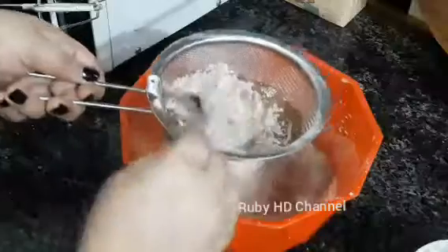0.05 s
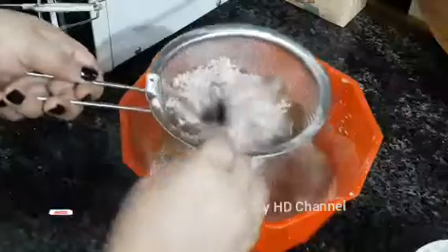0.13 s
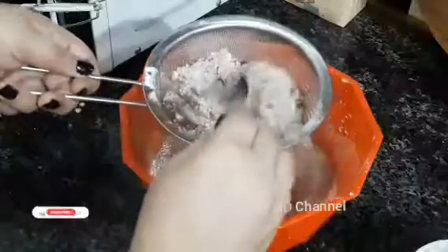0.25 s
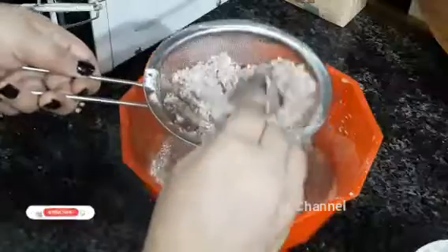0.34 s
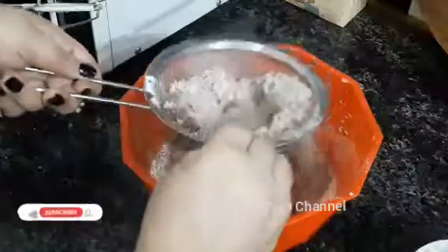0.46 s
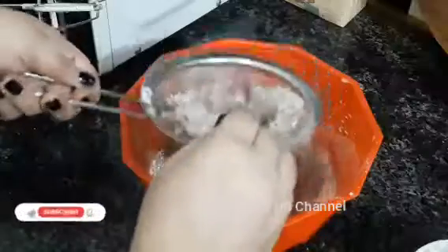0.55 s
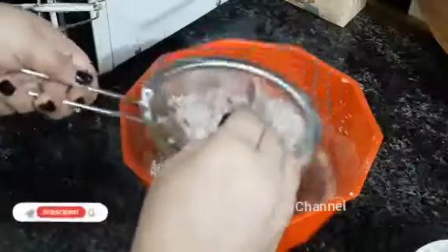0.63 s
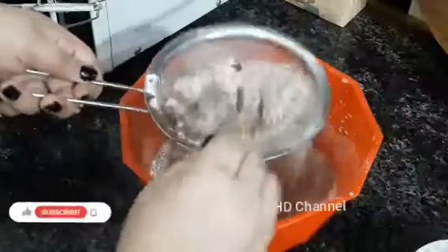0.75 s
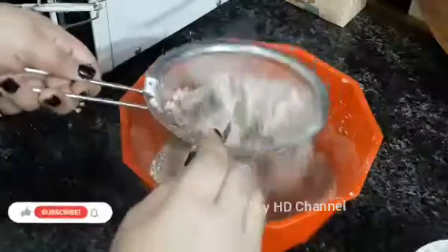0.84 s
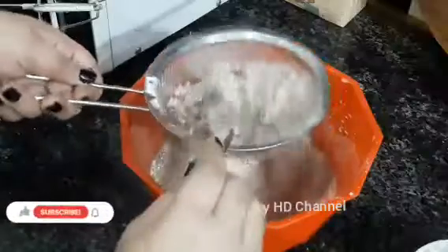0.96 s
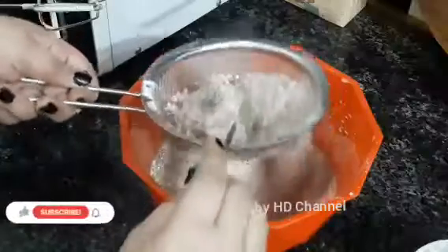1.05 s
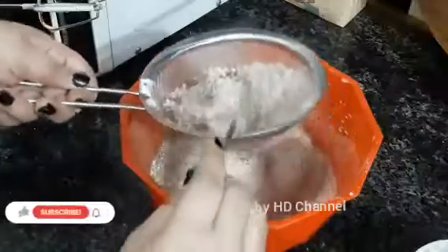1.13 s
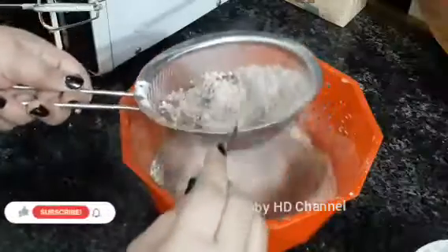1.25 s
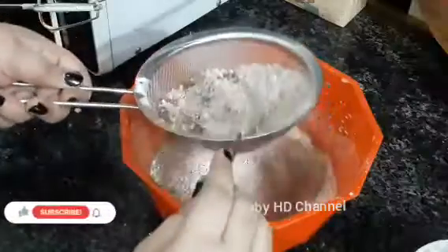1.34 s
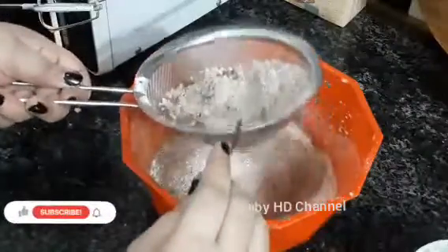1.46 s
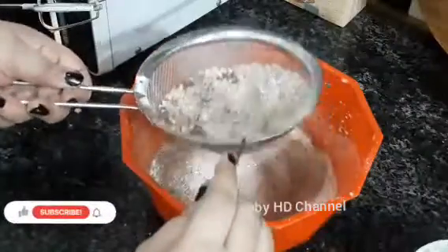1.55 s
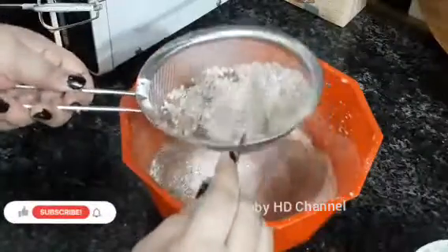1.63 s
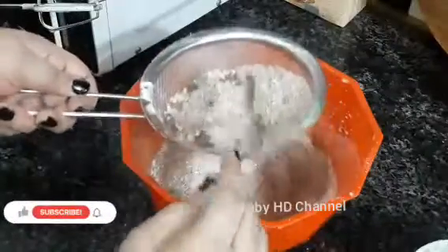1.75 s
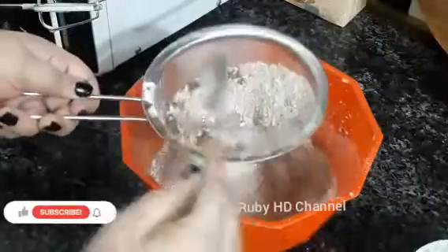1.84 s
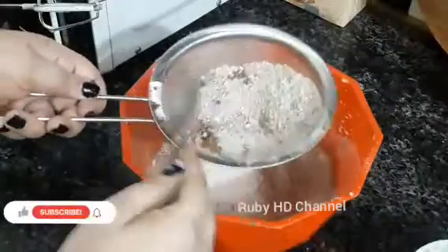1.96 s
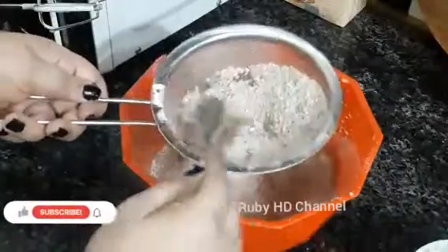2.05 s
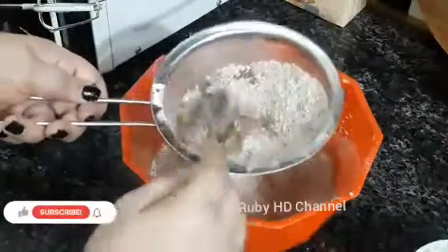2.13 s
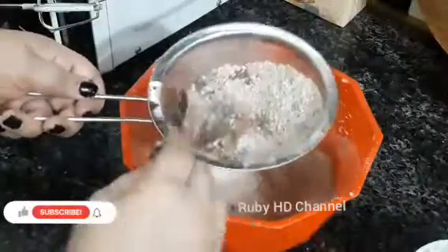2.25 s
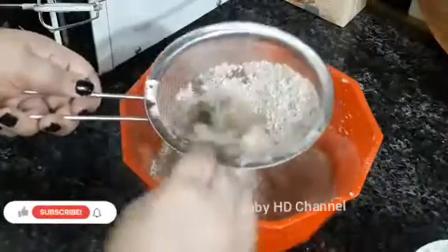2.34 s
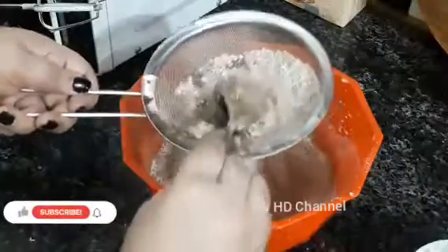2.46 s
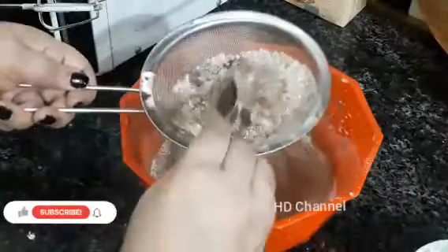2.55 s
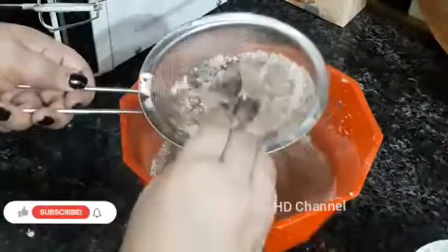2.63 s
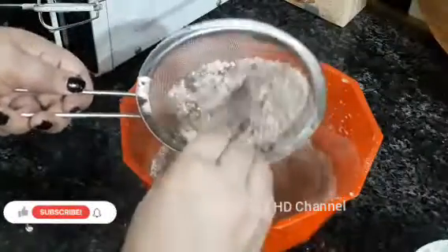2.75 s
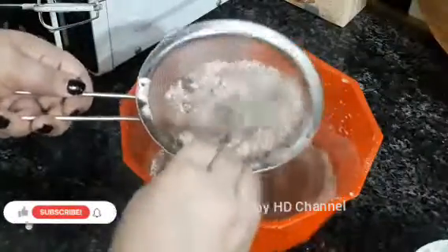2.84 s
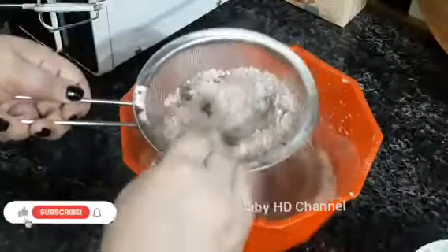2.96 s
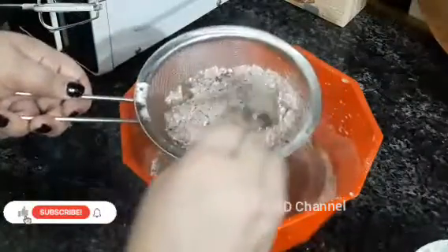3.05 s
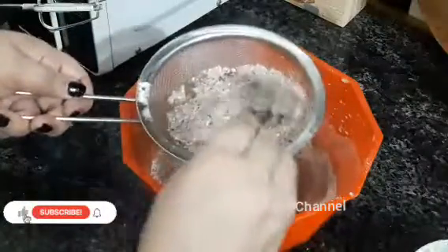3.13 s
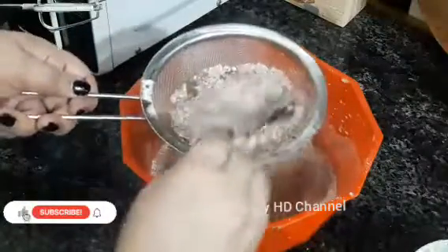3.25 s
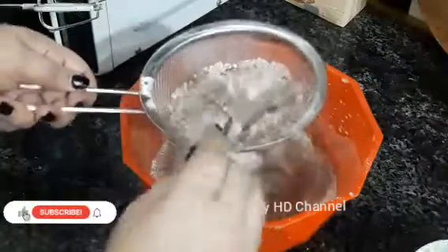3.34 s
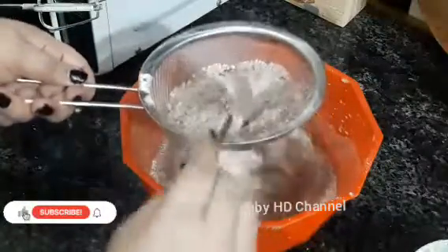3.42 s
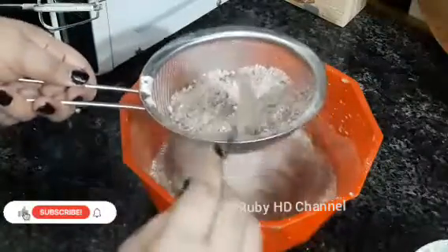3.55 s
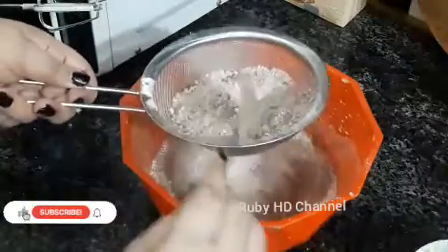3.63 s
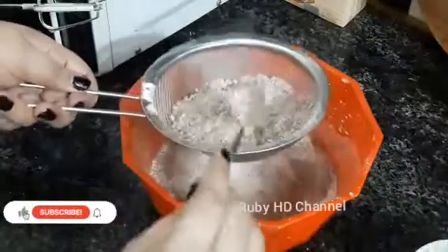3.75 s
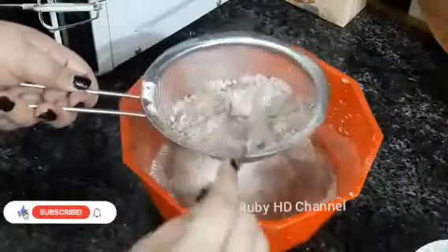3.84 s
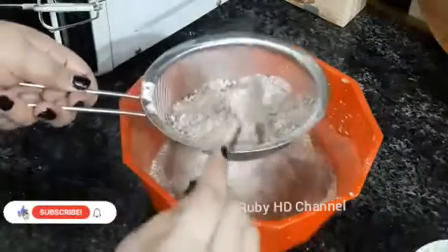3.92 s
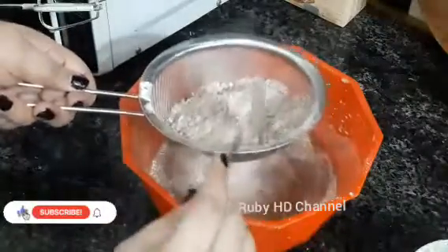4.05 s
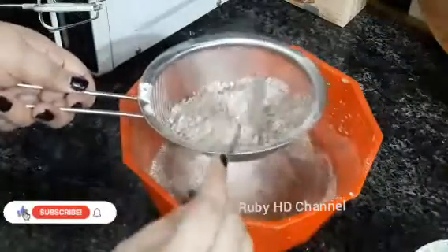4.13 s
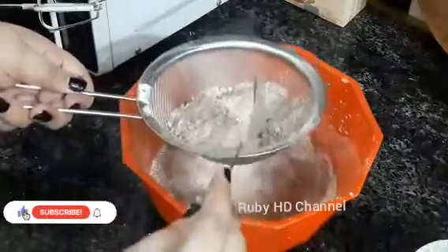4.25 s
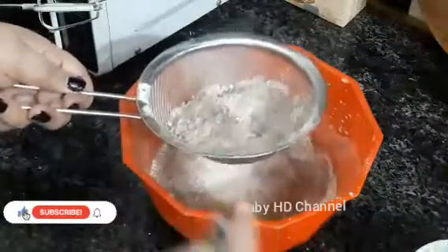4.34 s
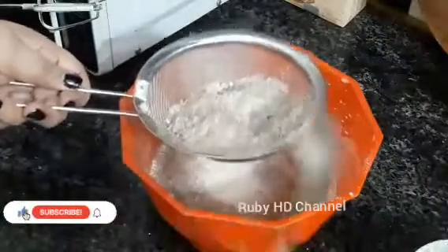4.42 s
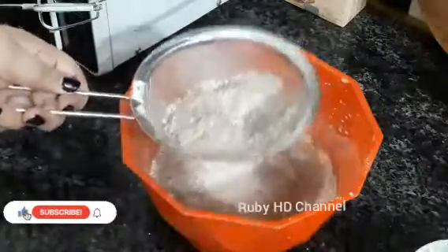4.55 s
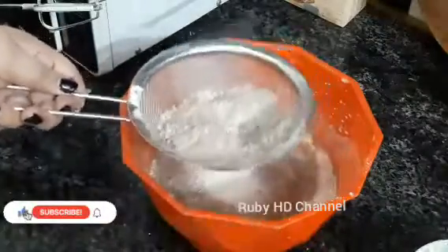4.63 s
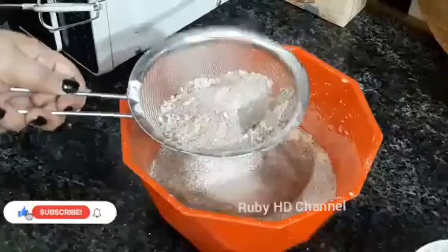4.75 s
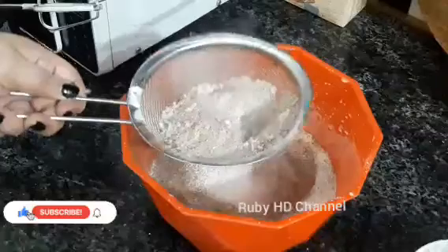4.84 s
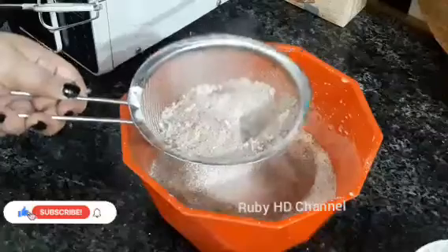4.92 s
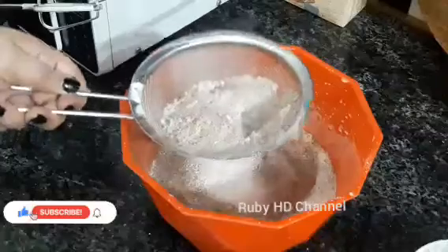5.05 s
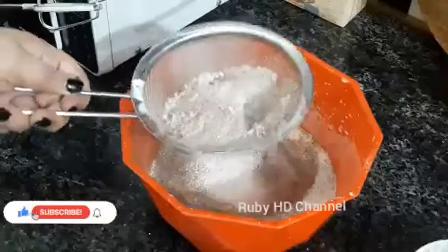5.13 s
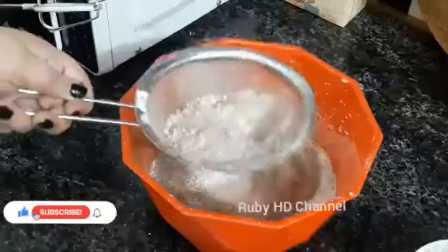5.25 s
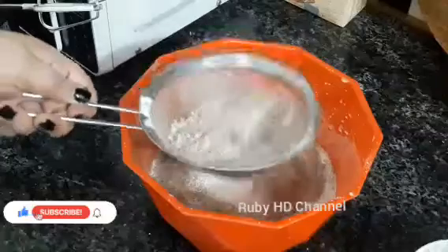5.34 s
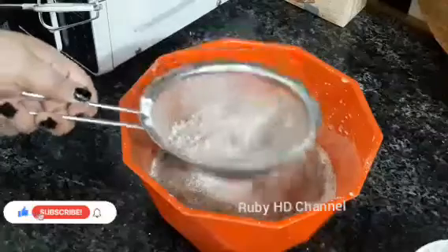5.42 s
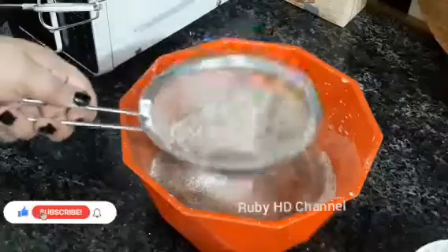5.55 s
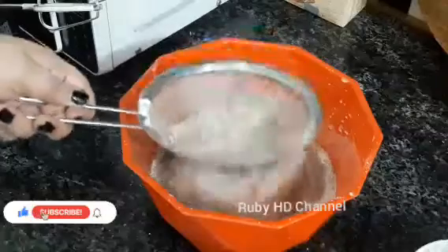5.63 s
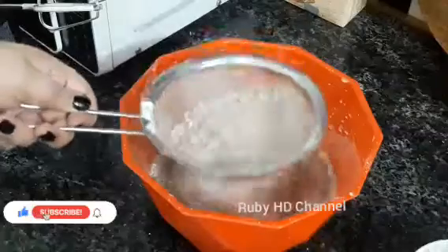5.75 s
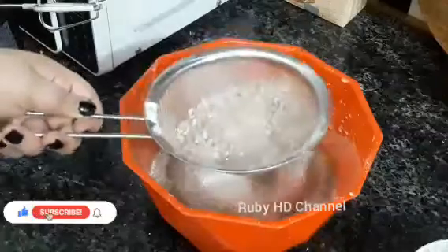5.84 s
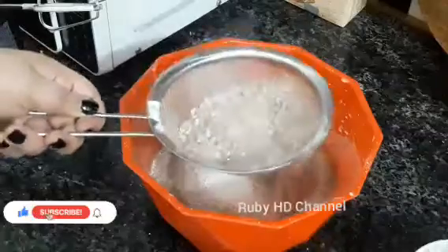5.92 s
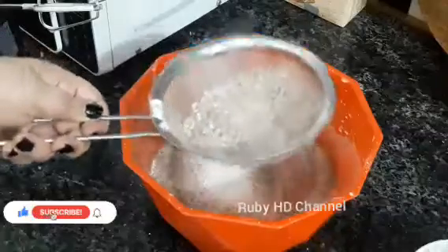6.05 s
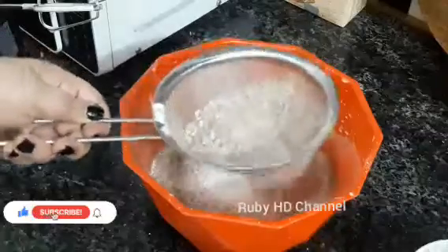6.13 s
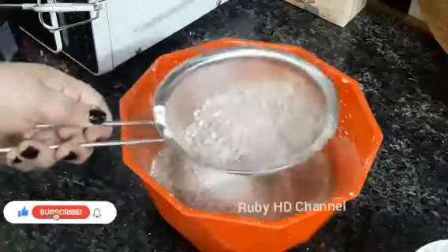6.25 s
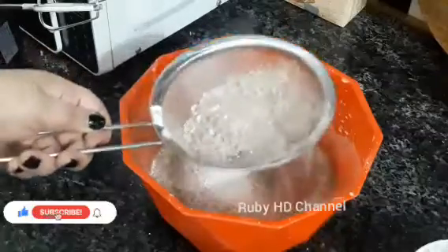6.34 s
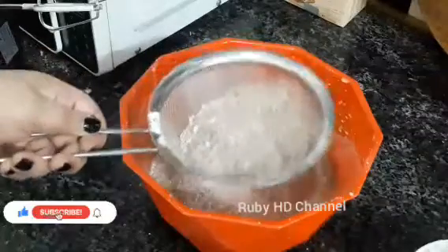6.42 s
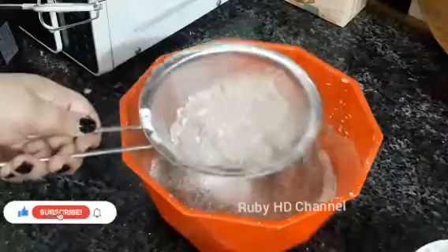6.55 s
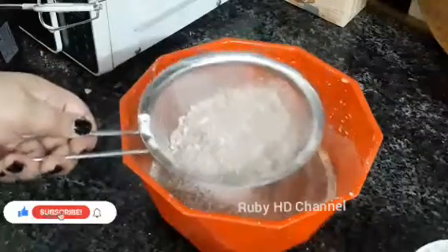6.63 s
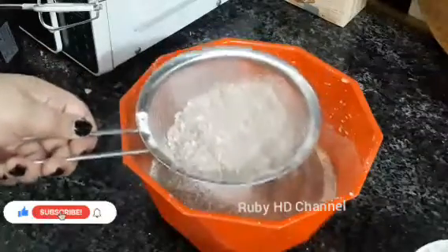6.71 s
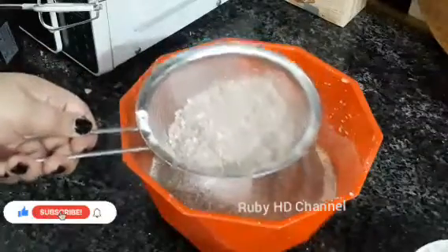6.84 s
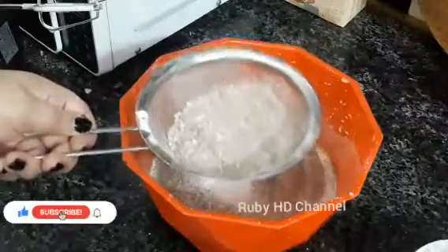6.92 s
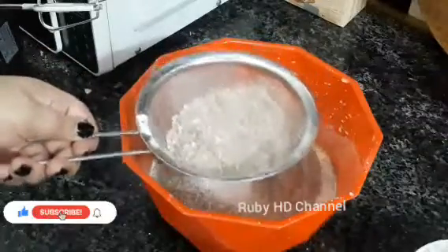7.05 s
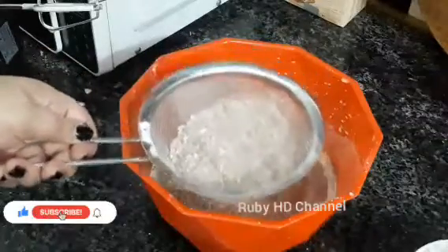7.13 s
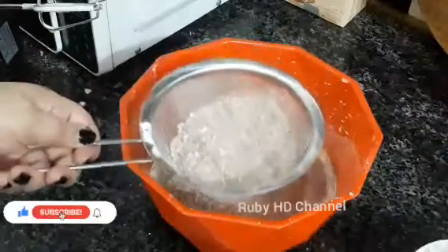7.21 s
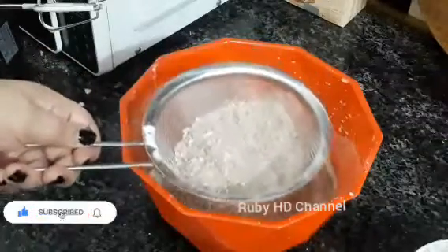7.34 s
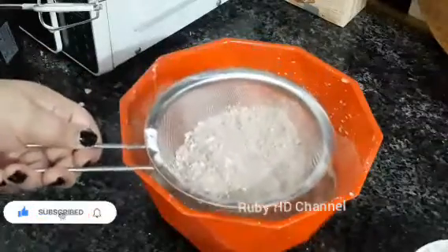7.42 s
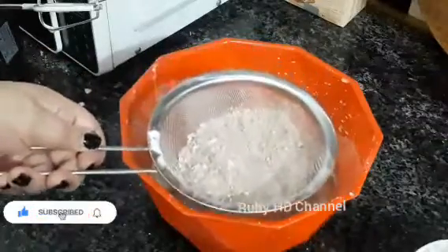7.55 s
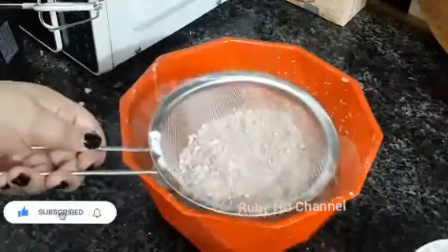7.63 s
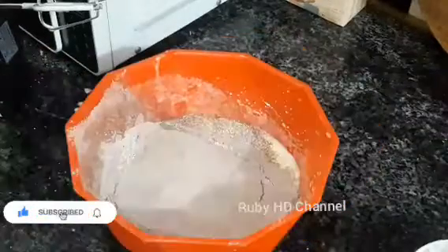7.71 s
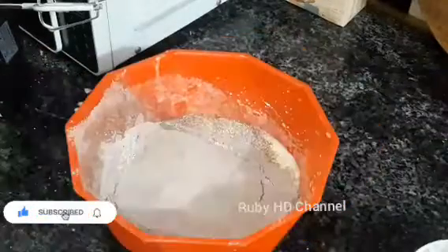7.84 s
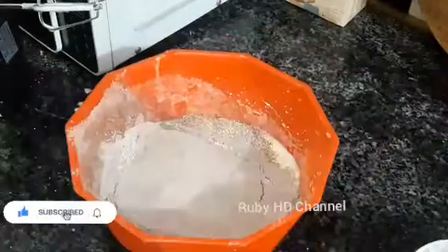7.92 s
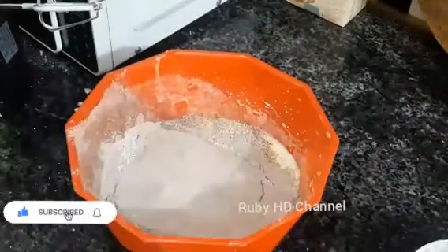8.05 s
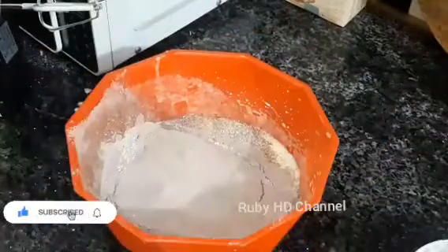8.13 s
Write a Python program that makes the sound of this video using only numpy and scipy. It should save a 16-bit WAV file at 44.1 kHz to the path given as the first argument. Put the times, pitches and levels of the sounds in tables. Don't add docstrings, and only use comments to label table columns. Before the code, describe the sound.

A spoon taps and scrapes a small wire sieve over a plastic bowl, then clatters onto stone, above low hum and a throbbing insect whine.

```python
import sys
import numpy as np
from scipy import signal
from scipy.fft import rfft, irfft, next_fast_len
from scipy.io import wavfile

SR = 44100
rng = np.random.default_rng(int(sys.argv[2]) if len(sys.argv) > 2 else 0)


def volts_from_decibels(level):
    exponent = np.asarray(level, float) / 20
    return 10 ** exponent


def transcribe(signal):
    frames = np.atleast_2d(signal).T
    limited = np.clip(frames, -1, 1)
    pcm = np.round(limited * 32767).astype(np.int16)
    wavfile.write(sys.argv[1], SR, pcm)


N = 360738
TIME = np.arange(N) / SR

# (frequency [Hz], level [dB per Hz])
RUMBLE_COLOUR = [(12, -90), (20, -42), (65, -26.5), (81, -15.5), (103, -16.5), (116, -10.5), (131, -16.5),
                 (202, -17.5), (334, -18), (581, -22), (834, -24), (1890, -43), (2520, -46), (4830, -51.5),
                 (6300, -63.5), (8190, -86), (13900, -120)]
# (frequency [Hz], level [dB per Hz])
HISS_COLOUR = [(6000, 0.5), (8200, -2), (8800, -13), (9600, -26.5), (10500, -14), (13000, -10), (14800, -4),
               (16000, -9)]
# (frequency [Hz], width [Hz], level [dB])
ROOM_TONES = [(240, 7.4, 1), (298.2, 8, -5), (355.8, 6.7, -2)]
# (middle [s], half length [s], level [dB])
FAR_BOUTS = [
    (0, 0.58, -68),
    (2.3, .25, -72),
    (4.5, .5, -75),
    (6.0, .5, -77),
    (8.2, .3, -74),
]
# (frequency [Hz], width [Hz], level [dB])
INSECTS = [(7323, 425, -47), (14900, 900, -82), (2383, 320, -71.5)]
# (time [s], lead [beats])
THROB_LEAD = [(0, 0.26), (4.8, 0.46), (6.2, 0.24), (7.65, .27)]
# (frequency [Hz], time to fall 60 dB [s])
ROOM_T60 = [(250, 0.61), (1000, 0.59), (3000, 0.49), (7000, 0.36), (15000, 0.25)]

# (time [s], peak [dB], pitch [Hz])
NUDGES = [
    (0.061, -39, 240),
    (2.325, -37, 270),
    (3.175, -38, 496),
    (3.189, -40, 1190),
    (3.21, -43, 1450),
    (3.2, -38, 350),
    (3.225, -39, 747),
    (7.51, -45, 343),
]
# (loudest at [s], swell [s], fade [s], level [dB], bowl relative [dB])
SCRAPES = [
    (0.062, 0.21, 0.21, -51.5, 0),
    (1.97, 0.011, 0.23, -40.5, -2),
    (2.335, 0.16, 0.075, -44.5, 0),
    (3.21, .07, 0.1, -41.5, 6.5),
    (8.17, 0.14, .3, -46, -20),
]
# (rim wire [dB], mesh sizzle [dB])
STROKE_TONE = [(1, 0), (-2, -3), (3.5, 0), (4.5, -1), (-6, -22)]
# (time [s], peak [dB], bowl thud relative [dB], mesh sizzle relative [dB])
TAPS = [(1.1882, -23.5, -13, 3), (1.274, -28.5, -4, -3), (1.363, -21.5, -13, 3), (1.518, -28, -18, -2),
        (1.526, -24, -12.5, 5), (1.5684, -29.5, -6, -14), (1.6761, -31.5, -8, 4), (1.681, -22, -14, 0),
        (1.959, -24.5, -6.5, -14), (3.493, -16.5, -18.5, -3), (3.5339, -27, -11.5, -5),
        (3.6728, -18, -16.5, 0), (3.719, -30.5, -18, -12), (3.8474, -19, -14, 2),
        (4.017, -21.5, -15.5, -1.5), (4.186, -17.5, -19.5, 4.5), (4.232, -32, -5.5, -14)]
# (time [s], peak [dB], mesh sizzle
# relative [dB])
SHAKES = [(0.606, -44, 2), (0.8245, -46.5, 3), (2.241, -41.5, -10), (2.826, -49.5, -17), (4.573, -42.5, 0),
          (4.7203, -56, 2), (4.879, -54, 3), (5.1714, -41, -1), (5.284, -55, 3), (5.3714, -55, 5),
          (5.5812, -50, 12), (5.7685, -56, 12), (6.1116, -58, 3), (6.34, -59, 2)]
# (frequency [Hz], level [dB per Hz])
TAP_COLOUR = [(250, -15), (500, 3), (900, -4.5), (2000, -6), (4000, -7.5), (6800, -0.5), (8600, -12),
              (11500, -2), (15000, -5), (16500, -1.5)]
# (frequency [Hz], level [dB], time to fall 60 dB [s])
RIM = [(1260, -17, .04), (2560, -13, .04), (3300, -14, .06), (5260, -13, .06), (6010, -7, .14),
       (6300, -9, .05), (6720, -9, .025), (7200, -8, .03)]
# (frequency [Hz], level [dB], time to fall 60 dB [s])
BOWL = [(260, -5.5, 0.09), (462, -4, .05), (513, 1, 0.06), (565, 0.5, 0.043), (635, -4.5, 0.034)]

# (frequency [Hz], level [dB], time to fall 60 dB [s])
HANDLE = [(2842, -2, .5), (2839.6, -4, .48), (2860, -9, .35), (2560, -12, .15), (3850, -13, .35)]
# (time [s], peak [dB], counter relative [dB])
BOUNCES = [(4.9948, -3.5, -26.5), (5.0015, -11, -12), (5.0164, -17, -55), (5.0334, -11, -23),
           (5.0458, -18, 3), (5.0564, -15.5, 7), (5.0611, -24, -8), (5.0713, -17.5, 2), (5.0844, -37, -7),
           (5.0944, -19, 0.5), (5.1055, -31.5, 16), (5.1174, -34, 1), (5.1284, -33, 8.5),
           (5.1424, -25.5, 6), (5.154, -53, -17)]
# (frequency [Hz], level [dB], time to fall 60 dB [s])
SPOON = [(3840, -4, .035), (4900, -10, .06), (4966, -8, .13), (5017, -8, .13), (5110, -10, .06),
         (5280, -11, .05), (5500, -11, .05), (6030, -15, .08), (7740, -15, .05), (10430, -21, .05),
         (10960, -24, .05), (11340, -21, .16), (13650, -20, .05), (14380, -17, .08)]
# (frequency [Hz], level [dB], time to fall 60 dB [s])
COUNTER = [(328, -10, .25), (480, -10, .08), (610, -9, .08), (672, -9, .1), (873, -12, .08), (960, -10, .1),
           (1145, -5, .1), (1366, -3, .09), (1395, -4, .1), (1426, -5, .07), (1561, -7, .1), (1509, -4, .1),
           (1690, -6, .06), (2170, -7, .05)]
# (frequency [Hz], level [dB per Hz])
CLATTER_COLOUR = [(120, -48), (200, -35), (316, 7.5), (440, -2.5), (671, 2), (1370, 4), (2420, -6.5),
                  (2910, -3.5), (3560, -12.5), (5130, -22), (16000, -56.5)]

CHANGE_S = 7.6522
RUMBLE_DB, RUMBLE_SINK_DB_PER_S, RUMBLE_LATE_DB = -51, 0.1265, -1.5
DRONE_DB, DRONE_FADE_DB_PER_S, DRONE_REST_DB = -44, 10.5, -59
HUM_HZ, HUM_DB = 100.488, -37.5
HUM_START_TURNS, HUM_JUMP_TURNS = -.09, .47
MOTOR_HZ, MOTOR_DB = 137.2, -46.5
THROB_HZ, THROB_JUMP_BEATS, THROB_LATE_HZ = 9.45, -.42, 0.38
PAUSE_S, PAUSE_WIDTH_S, PAUSE_DB = 5.17, .05, -5.5
STROKE_RANGE_DB, STROKE_BEND = 33, 1.19
BOWL_UPPER_DB = -3.5
TAP_KNOCK_DB, SHAKE_KNOCK_DB, SHAKE_THUD_DB = -5, -4, -10
REBOUND_GAP_S, REBOUND_KNOCK_DB = .06, 4
SHAKE_RING_DB = -8
TAIL_GRAIN_DB = 2
FLAT_S, HANDLE_DB, HANDLE_RISE_S = 5.075, -21, 0.027


def rms_one(x):
    return x / np.sqrt(np.mean(x ** 2) + 1e-20)


def at_hz(points, hz):
    point_hz, value = np.transpose(points)
    return np.interp(np.log(hz + 1), np.log(point_hz), value)


def coloured(spectrum):
    size = next_fast_len(N, True)
    hz = np.fft.rfftfreq(size, 1 / SR)
    white = rfft(rng.standard_normal(size))
    return rms_one(irfft(white * volts_from_decibels(at_hz(spectrum, hz)), size)[:N])


def band(x, low_hz, high_hz, order=2):
    return signal.sosfilt(signal.butter(order, [low_hz, high_hz], "band", fs=SR, output="sos"), x)


def drift(rate):
    r = np.exp(-80 * np.pi * rate / SR)
    slow = signal.lfilter([1], [1, -2 * r, r * r], rng.standard_normal(N // 40 + 2002))[2000:]
    return np.interp(np.arange(N) / 40, np.arange(len(slow)), rms_one(slow))


def clicks(times, db):
    out = np.full(N, 1e-18)
    out[np.round(np.asarray(times) * SR).astype(int)] = volts_from_decibels(db)
    return out


def dying(train, t60, rise_s=0.00044):
    r = np.exp(-1 / (max(rise_s, 1e-4) * SR))
    return signal.lfilter([1 - r], np.convolve([1, -r], [1, -volts_from_decibels(-60 / (t60 * SR))]), train)


def struck(modes, times, db, spread_db):
    luck = rng.standard_normal((len(times), len(modes)))
    out = np.zeros(N)
    for k, (hz, mode_db, t60) in enumerate(modes):
        r, w = volts_from_decibels(-60 / (t60 * SR)), 2 * np.pi * hz / SR
        hits = clicks(times, db + mode_db + spread_db * luck[:, k])
        out += signal.lfilter([0, np.sin(w)], [1, -2 * r * np.cos(w), r * r], hits)
    return out


def room_floor():
    sinking = RUMBLE_DB - RUMBLE_SINK_DB_PER_S * TIME + RUMBLE_LATE_DB * (TIME >= CHANGE_S)
    rumble = coloured(RUMBLE_COLOUR) * volts_from_decibels(sinking + 0.5 + 1.0 * drift(6.4))
    white = rng.standard_normal(N)
    tones = np.zeros(N)
    for hz, width_hz, db in ROOM_TONES:
        tones += volts_from_decibels(db) * rms_one(band(white, hz - width_hz / 2, hz + width_hz / 2))
    drone = volts_from_decibels(DRONE_DB - DRONE_FADE_DB_PER_S * TIME) + volts_from_decibels(DRONE_REST_DB)
    bouts = sum(volts_from_decibels(db) * np.exp(-((TIME - s) / half_s) ** 2) for s, half_s, db in FAR_BOUTS)
    far_insect = rms_one(band(white, 4760, 5500)) * bouts
    hiss = volts_from_decibels(-60.5) * band(coloured(HISS_COLOUR), 7600, 17400)
    return rumble + tones * drone * volts_from_decibels(-10.5) + far_insect + hiss


def hum():
    late = TIME >= CHANGE_S
    turns = HUM_HZ * TIME + HUM_START_TURNS + HUM_JUMP_TURNS * late
    mains = np.cos(2 * np.pi * turns) * volts_from_decibels(HUM_DB + .15 * drift(4.9))
    motor_phase = 2 * np.pi * MOTOR_HZ * (TIME - CHANGE_S) + 0.22 * drift(4.5)
    motor = np.sin(motor_phase) * volts_from_decibels(MOTOR_DB + .7 * drift(4.7))
    step = dying(clicks([CHANGE_S], -42), .02, rise_s=0)
    return mains + late * motor - step


def insects():
    after_change = THROB_JUMP_BEATS + THROB_LATE_HZ * (TIME - CHANGE_S)
    lead = np.interp(TIME, *np.transpose(THROB_LEAD))
    beat = 2 * np.pi * (THROB_HZ * TIME + lead + (TIME >= CHANGE_S) * after_change)
    throb_db = (4.3 + 0.5 * drift(0.56)) * np.cos(beat) + 1.0 * np.sin(2 * beat + 0.61)
    wings = rng.standard_normal(N) * volts_from_decibels(0.33 * drift(72))
    out = np.zeros(N)
    for share, (hz, width_hz, db) in zip([1, .6, .2], INSECTS):
        peak = band(wings, hz - width_hz / 2, hz + width_hz / 2, order=1)
        voice = rms_one(band(peak, hz - 0.98 * width_hz, hz + 0.75 * width_hz, order=3))
        out += voice * volts_from_decibels(db + share * throb_db + (1 - share) * 1.5 * drift(4))
    return out * volts_from_decibels(PAUSE_DB * np.exp(-((TIME - PAUSE_S) / PAUSE_WIDTH_S) ** 2))


def kitchen(x):
    t = TIME[:SR]
    edges = 150 * 2 ** np.arange(0, 7.1, .5)
    white = rng.standard_normal((2, SR))
    tail = np.zeros(SR)
    for k, (low, high) in enumerate(zip(edges, edges[1:])):
        t60 = at_hz(ROOM_T60, np.sqrt(low * high))
        tail += band(white[k % 2], low, high) * volts_from_decibels(-60 * t / t60)
    tail *= np.clip((t - .003) / 0.013, 0, 1)
    return signal.fftconvolve(x, tail / np.sqrt(np.sum(tail ** 2)))[:N]


def nudges():
    return sum(struck([(hz, 0, .09)], [s], np.array([db]), spread_db=3.0) for s, db, hz in NUDGES)


def scrapes():
    strength = volts_from_decibels(3.5 * np.minimum(rng.exponential(1, N), 3))
    grit = (rng.random(N) < 7000 / SR) * strength * rng.choice([-1, 1], N)
    grit = grit * volts_from_decibels(1.5 * drift(40))
    wire = rms_one(band(grit, 5880, 6080))
    middle = rms_one(band(grit, 1250, 5960, order=3))
    sizzle = -rms_one(band(grit, 7200, 21000))
    bowl = rms_one(band(grit, 250, 640)) - volts_from_decibels(BOWL_UPPER_DB) * rms_one(band(grit, 600, 1280))
    out = np.zeros(N)
    for (s, swell_s, fade_s, db, bowl_db), (wire_db, sizzle_db) in zip(SCRAPES, STROKE_TONE):
        away = np.maximum((s - TIME) / swell_s, (TIME - s) / fade_s)
        press = volts_from_decibels(db - 5 - STROKE_RANGE_DB * np.minimum(away, 4) ** STROKE_BEND)
        out += press * (middle + volts_from_decibels(wire_db - 5) * wire + volts_from_decibels(bowl_db) * bowl + volts_from_decibels(sizzle_db) * sizzle)
    return out


def taps():
    blows = [(s, db, thud, TAP_KNOCK_DB, sizzle) for s, db, thud, sizzle in TAPS]
    blows += [(s, db, SHAKE_THUD_DB, SHAKE_KNOCK_DB, sizzle) for s, db, sizzle in SHAKES]
    s, db, thud, knock, sizzle = np.transpose(blows)
    rebound = (np.abs(s - np.roll(s, 1)) < REBOUND_GAP_S) & (db < np.roll(db, 1))
    knock = knock + REBOUND_KNOCK_DB * rebound
    jostle = volts_from_decibels(2.0 * drift(200))
    is_shake = np.arange(len(s)) >= len(TAPS)
    rim = struck(RIM, s, db - 10 + SHAKE_RING_DB * is_shake, spread_db=3.0)
    rings = rim + struck(BOWL, s, db + thud - 8, spread_db=5.0)
    # (low [Hz], high [Hz], level [dB], blow t60 [s], tail [dB], tail t60 [s])
    parts = [(248, 720, thud + 5, 0.041, -10, 0.38), (925, 2780, knock + 4, 0.024, -12.5, 0.61),
             (3000, 7970, 0.55, 0.035, -10, 0.45), (8300, 20200, sizzle - 1.5, 0.029, -9, 0.33)]
    rattle = np.zeros(N)
    for low_hz, high_hz, rel_db, t60, tail_db, tail_t60 in parts:
        train = clicks(s, db + rel_db)
        power = dying(train ** 2, tail_t60 / 2, rise_s=0.0094)
        tail = volts_from_decibels(tail_db + TAIL_GRAIN_DB * drift(45)) * np.sqrt(power)
        envelope = dying(train, t60) * jostle + tail
        rattle += band(envelope * coloured(TAP_COLOUR), low_hz, high_hz)
    return rings, rattle


def handle():
    build_up = 1 - np.exp(-np.maximum(TIME - FLAT_S, 0) / HANDLE_RISE_S)
    return struck(HANDLE, [FLAT_S], HANDLE_DB, spread_db=0) * build_up


def dropped_spoon():
    s, db, counter = np.transpose(BOUNCES)
    steel = struck(SPOON, s, db - 12.5, spread_db=3.0)
    boom = struck(COUNTER, s, db + counter - 18.5, spread_db=3.0)
    crack_envelope = dying(clicks(s, db + counter - 5.5), 0.057, rise_s=0.00082)
    crack = band(crack_envelope * coloured(CLATTER_COLOUR), 330, 15500)
    jingle_envelope = dying(clicks(s, db - 18), .06, rise_s=.001)
    jingle = jingle_envelope * rms_one(band(rng.standard_normal(N), 9000, 17000))
    return steel + boom + crack + volts_from_decibels(-10) * jingle


def scene():
    rings, rattle = taps()
    close = band(rings + nudges() + scrapes() + dropped_spoon(), 190, 21000)
    mono = close + volts_from_decibels(-5) * kitchen(close) + handle() + rattle + insects() + room_floor()
    grit = volts_from_decibels(-35.5) * band(mono * rng.standard_normal(N), 10500, 17000)
    grit += volts_from_decibels(-29.5) * band(mono * drift(200), 3000, 6400)
    grit += volts_from_decibels(-40) * band(mono * drift(60), 380, 2500, order=3)
    return mono + hum() + grit * np.array([[1], [-1]])


def roll_off(x):
    return signal.sosfilt(signal.butter(12, 16620, fs=SR, output="sos"), x)


def record(dry):
    shelf = signal.cheby2(14, 27, 15700, fs=SR, output="sos")
    wall = signal.cheby2(16, 60, 16850, fs=SR, output="sos")
    rounded = .7 * np.tanh(dry / .7)
    mix = signal.sosfilt(np.vstack([shelf, wall]), rounded)
    return roll_off(mix)


dry = scene()
out = record(dry)
transcribe(out)
```